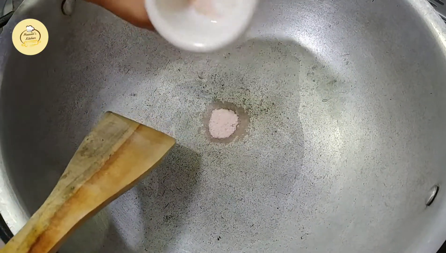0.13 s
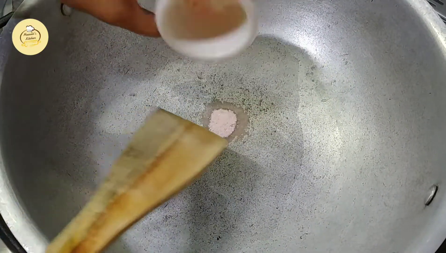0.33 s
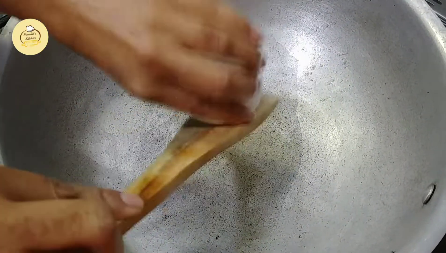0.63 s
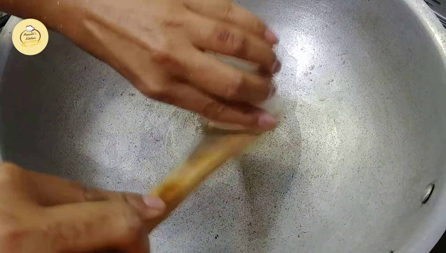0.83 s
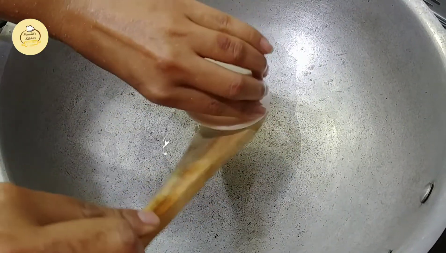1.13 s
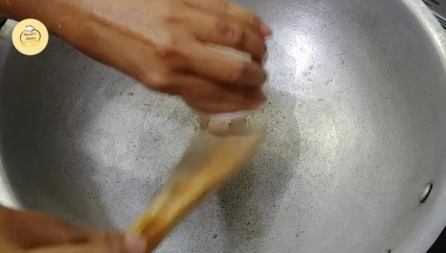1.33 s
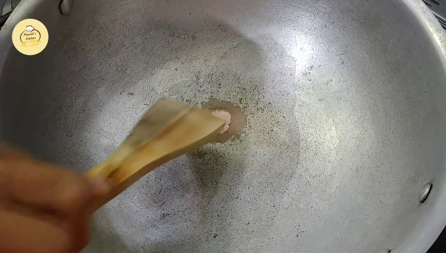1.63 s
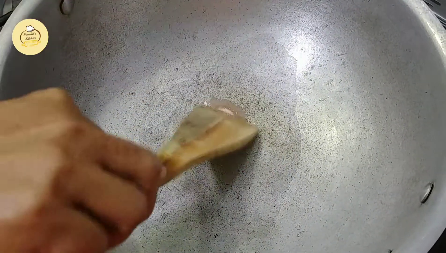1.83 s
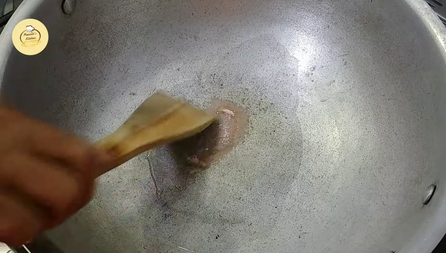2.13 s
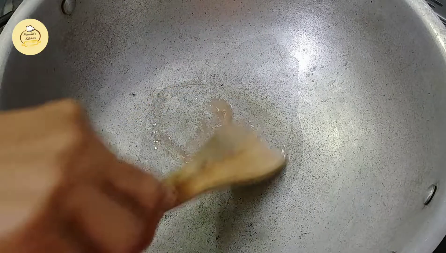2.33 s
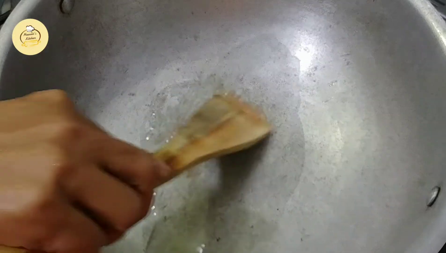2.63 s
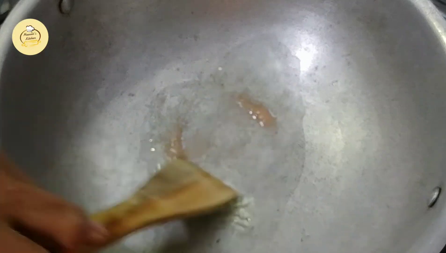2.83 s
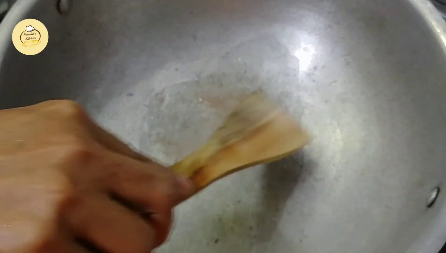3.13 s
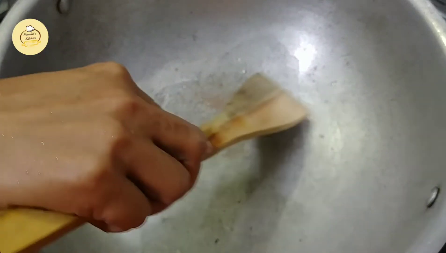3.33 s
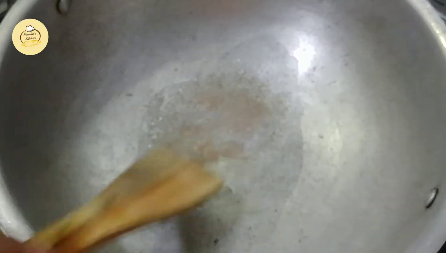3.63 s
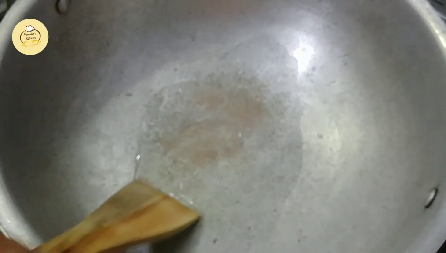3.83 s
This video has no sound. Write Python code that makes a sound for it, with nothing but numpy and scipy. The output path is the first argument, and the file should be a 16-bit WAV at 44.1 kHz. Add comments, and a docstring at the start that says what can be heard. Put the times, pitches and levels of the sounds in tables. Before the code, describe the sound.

Small cup knocks three times on a wooden spatula, then the spatula scrapes a sizzling metal pan.

```python
"""At the stove in a hard-walled kitchen, two microphones: a steady rumble, hiss and motor hum, faint sizzle.
A light bump and tick in the pan come first, then a small cup knocks three times on a wooden spatula
over the hot metal pan, which rings softly in answer. The sizzle jumps up and swells as wet seasoning is
spread, and the blade stirs in four strokes of rubbing noise, with grit catches and bumps that ring the pan.
Noise bursts and dying sines make the knocks, random grains the rubbing and sizzle; echoes place them."""
import sys
import numpy as np
from scipy import signal
from scipy.fft import rfft, irfft
from scipy.io import wavfile
from scipy.ndimage import uniform_filter1d, minimum_filter1d

SR = 44100
rng = np.random.default_rng(int(sys.argv[2]) if len(sys.argv) > 2 else 0)


def dump(signal):
    """Clip the signal to [-1, 1] and save it as 16-bit WAV at the path in sys.argv[1]."""
    limited = np.clip(np.atleast_2d(signal).T, -1, 1)
    pcm = np.round(limited * 32767).astype(np.int16)
    wavfile.write(sys.argv[1], SR, pcm)


N = 176400  # 4 s


def amp(db):
    """Decibels to gain."""
    return 10 ** (np.asarray(db) / 20)


def unit(x):
    """Scales to rms 1."""
    return x / np.sqrt(np.mean(x ** 2) + 1e-20)


def read(points, hz):
    """Reads a table of (hz, value) on a log-frequency axis."""
    point_hz, value = np.transpose(points)
    return np.interp(np.log(hz + 1), np.log(point_hz + 1), value)


def add(mix, start_s, sound):
    """Adds a sound to the mix in place, cut off where the mix ends."""
    part = mix[max(round(start_s * SR), 0):][:len(sound)]
    part += sound[:len(part)]


def colour(x, points, peaks=(), size=4096):
    """Minimum-phase filter: energy never precedes its cause; peaks add resonances to the spectrum."""
    hz = abs(np.fft.fftfreq(size, 1 / SR))
    resonance = 1 + sum(amp(db) / (1 + (2 * (hz - f) / width) ** 2) for f, width, db in peaks)
    gain = amp(read(points, hz)) * resonance
    # the Hilbert transform of the log gain gives the minimum phase
    spectrum = np.exp(np.conj(signal.hilbert(np.log(gain))))
    taps = np.fft.ifft(spectrum).real
    return signal.oaconvolve(x, taps)[:len(x)]


def band(x, hz, kind, order=2):
    """Butterworth low-pass or high-pass."""
    sections = signal.butter(order, min(hz, SR / 2 - 1), kind, fs=SR, output="sos")
    return signal.sosfilt(sections, x)


def ring(modes, pitch=1):
    """Half a second of dying sines, one for each mode of a struck body."""
    t = np.arange(SR // 2) / SR
    return sum(amp(db - 60 * t / t60) * np.sin(2 * np.pi * hz * pitch * t) for hz, db, t60 in modes)


def burst(t60):
    """Half a second of white noise that falls 60 dB in t60 seconds."""
    t = np.arange(SR // 2) / SR
    return rng.standard_normal(len(t)) * np.exp(-np.log(1000) * t / t60)


def grains(per_s, spread_db):
    """Random clicks of either sign, mostly small, a few large."""
    size = amp(spread_db * np.minimum(rng.exponential(1, N), 5))
    sign = rng.choice([-1, 1], N)
    present = rng.random(N) < per_s / SR
    return unit(size * sign * present)


def wander(hz):
    """Random fluctuation of rms 1, mostly slower than hz."""
    rolloff = 1 + (np.fft.rfftfreq(N, 1 / SR) / hz) ** 4
    return unit(irfft(rfft(rng.standard_normal(N)) / rolloff, N))


MONO_BELOW_HZ = 680


def pair(a, b):
    """Two noises become left and right, alike in the bass and increasingly independent above."""
    same = 1 / (1 + (np.fft.rfftfreq(len(a), 1 / SR) / MONO_BELOW_HZ) ** 2)
    right = irfft(same * rfft(a) + np.sqrt(1 - same ** 2) * rfft(b), len(a))
    return np.array([a, right])


# Decay of the kitchen before its spectrum is evened: pitch_hz, t60_s
ROOM_DECAY = [(100, 1), (500, 0.37), (1400, 0.29), (4000, 0.23), (10000, 0.31)]
ROOM_ONSET_S, ROOM_EVEN_HZ = 0.005, 45  # rise time; width over which the spectrum is evened


def room_tail():
    """Diffuse stereo tail: low bass lingers longest, and the spectrum is evened out."""
    t = np.arange(SR // 2) / SR
    noise = pair(*rng.standard_normal((2, len(t))))
    hz, when, z = signal.stft(noise, SR, nperseg=256)
    z *= np.exp(-np.log(1000) * when / read(ROOM_DECAY, hz)[:, None])
    onset = np.minimum(t / ROOM_ONSET_S, 1)
    decaying = signal.istft(z, SR)[1][:, :len(t)] * onset
    spectrum = rfft(decaying, SR)
    power = uniform_filter1d(abs(spectrum) ** 2, ROOM_EVEN_HZ, axis=1)
    tail = irfft(spectrum / np.sqrt(power), SR)[:, :len(t)] * onset
    return tail / np.linalg.norm(tail[0])


# Early wall reflections: delay_s, left_gain, right_gain (both before echo_db)
WALL_ECHOES = [(.0032, 0.15, 0.16), (.0092, 0.13, 1), (0.0108, 0.083, 0.71), (0.0145, .4, .2),
               (.0255, 0.1, 0.42)]
RIGHT_LAG = 6  # samples by which direct sound is later at the right microphone, about 5 cm of path
DRIFT_HZ = 2.1  # how fast the paths to the walls change as the hands move


def kitchen(x, room_db, echo_db, count=4):
    """Direct sound, a few wall reflections, and diffuse tails that take turns as the paths change."""
    early = np.zeros((2, SR // 20))
    early[0, 0] = early[1, RIGHT_LAG] = 1
    for delay_s, left, right in WALL_ECHOES:
        early[:, round(delay_s * SR)] += amp(echo_db) * np.array([left, right])
    out = signal.oaconvolve(x[None], early, axes=1)[:, :N]
    turn = 2 * np.pi * DRIFT_HZ * np.arange(N) / SR
    shares = np.array([np.maximum(np.cos(turn - 2 * np.pi * k / count), 0) for k in range(count)])
    for share in shares / np.linalg.norm(shares, axis=0):
        out += amp(room_db) * signal.fftconvolve((x * share)[None], room_tail(), axes=1)[:, :N]
    return out / np.sqrt(1 + amp(room_db) ** 2)


RING_LAG_S = 0.00035  # about 12 cm of path


def spread(x):
    """The wide pan's ring reaches the right microphone a little later."""
    delay = np.exp(-2j * np.pi * np.fft.rfftfreq(N, 1 / SR) * RING_LAG_S)
    return np.array([x, irfft(rfft(x) * delay, N)])


# Rumble and hiss at the stove as heard at the microphones: pitch_hz, level_db (relative, per Hz)
STOVE_HEARD = [(20, -39), (33, -20), (50, -15), (70, -3), (105, 1.5), (140, -6.5), (230, -6.5),
               (340, -13.5), (600, -17), (1400, -27), (6000, -35), (8100, -35.5), (9600, -46.5),
               (12000, -41), (15500, -35)]
# Motor hum: pitch_hz, level_db (rms, before the balance of the microphones)
MOTOR_HUM = [(101, -49), (200, -69), (250, -61.5)]
STOVE_DB = -47.5  # rms, before the balance of the microphones


def stove():
    """Steady filtered noise rumbles and hisses; the motor hums on sines whose phase wavers."""
    t = np.arange(N) / SR
    rumble = pair(*[unit(colour(z, STOVE_HEARD)) for z in rng.standard_normal((2, N))])
    hum = np.zeros(N)
    for hz, db in MOTOR_HUM:
        phase = 2 * np.pi * hz * t + 1.05 * wander(4.5)  # radians
        hum += amp(db) * np.sqrt(2) * np.sin(phase)
    return amp(STOVE_DB) * rumble + hum


# How loudly the seasoning sizzles before the room: time_s, level_db
SIZZLE_LOUDNESS = [(0, -57), (.7, -60.5), (1.55, -63), (1.674, -47.5), (1.686, -49), (2.15, -51),
                   (2.5, -33.5), (3.1, -38), (3.33, -41), (3.7, -43.5), (4, -40)]
# Sizzle as heard at the microphones, with a narrow peak near 8 kHz and little just above it:
# pitch_hz, level_db (relative, per Hz)
SIZZLE_HEARD = [(500, -24.5), (2000, -16), (4000, -15), (6000, -20), (7000, -8.5), (7900, 6.5), (8500, -1),
                (9500, -11.5), (10800, -66.5), (12500, -20), (15500, -26)]
POPS_PER_S, POP_SPREAD_DB, SIZZLE_ROOM_DB = 1300, 4.5, 7


def sizzle():
    """Tiny bubbles burst at random, more loudly once the wet seasoning is spread."""
    level = amp(np.interp(np.arange(N) / SR, *np.transpose(SIZZLE_LOUDNESS)))
    pops = unit(colour(grains(POPS_PER_S, POP_SPREAD_DB), SIZZLE_HEARD))
    return kitchen(level * pops, SIZZLE_ROOM_DB, echo_db=-13)


# Spatula bumping the pan (levels relative):
# start_s, level_db, lowest_hz, highest_hz, chatter_t60_s, ring_db
PAN_BUMPS = [(0.037, -27, 60, 197, 0.058, 11.5), (0.655, -29.5, 235, 1780, 0.05, 4),
             (1.797, -14.5, 130, 1780, .06, -4), (2.842, 0.5, 87, 700, 0.16, 6),
             (3.061, -4.5, 109, 3254, 0.054, 2), (3.073, -3.5, 110, 3100, 0.077, -11),
             (3.396, -27, 120, 1490, 0.063, 6), (3.782, -9.5, 650, 785, 0.033, 16),
             (3.858, -8, 100, 774, 0.061, -14)]
# Modes of the pan on its stand: pitch_hz, level_db (relative), t60_s
PAN_MODES = [(74, -4, .4), (118, -3, .45), (200, -9, .3), (252, 0, .4), (302, -7, .36), (338, -1, .45),
             (369, -4, .38), (452, -7, .32), (712, -7, .3), (750, -2, .28), (846, 2, .32), (1448, -8, .28),
             (2169, -10, .22)]
PAN_DB, THUD_DB, THUD_T60, CHATTER_DB, KNOCK_ROOM_DB = -28, 5.5, 0.027, -11, 5  # dB, T60 in s


def knocks():
    """The blade bumps the pan, chatters briefly and sets it ringing; each contact has its own band."""
    thuds, rings = np.zeros((2, N))
    for start_s, db, low_hz, high_hz, chatter_s, ring_db in PAN_BUMPS:
        thud = amp(THUD_DB) * (burst(THUD_T60) + amp(CHATTER_DB) * burst(chatter_s))
        pan_ring = amp(PAN_DB + ring_db) * ring(PAN_MODES)
        for mix, sound in (thuds, thud), (rings, pan_ring):
            below = band(sound, high_hz, "low", order=4)
            contact = band(below, low_hz, "high", order=3)
            add(mix, start_s, amp(db) * contact)
    return kitchen(thuds, KNOCK_ROOM_DB, echo_db=-1) + spread(rings)


# Strokes of the spatula, one list each: time_s, level_db (rubbing, relative), extra_treble_db
STIR_STROKES = [
    [(1.79, -35, -3.5), (1.81, -49.5, -3.5), (1.885, -38, 5), (1.94, -49, 7), (1.965, -38, 0.5),
     (1.99, -32.5, 0.5), (2.03, -39, -30), (2.08, -70, 4)],
    [(2.195, -63.5, 21.5), (2.235, -39.5, -1.5), (2.28, -32.5, -9.5), (2.33, -30, -3.5), (2.38, -36.5, 6),
     (2.42, -32, -2), (2.5, -37.5, -0.5), (2.57, -23.5, -5), (2.598, -26, 4), (2.607, -25, 10),
     (2.624, -33, 2), (2.636, -31.5, -1), (2.7, -33, -9), (2.712, -28, -32), (2.76, -28, 5.5),
     (2.8, -33, -19), (2.85, -24, -8), (2.93, -34.5, 2), (3.0, -23, -2), (3.05, -43, -36), (3.16, -38, -18)],
    [(3.39, -70, 28), (3.402, -45, 6), (3.45, -37, 3), (3.47, -34.5, 6.5), (3.52, -28, 1.5),
     (3.545, -82, -13), (3.61, -73, -3)],
    [(3.855, -31, -28), (3.87, -27, -8), (3.92, -23.5, -3), (3.945, -25.5, -20), (3.97, -33, -16),
     (4.0, -59, -9)],
]
# Sharp ticks in the pan, mostly the blade catching on grit: start_s, level_db (relative)
GRIT_CATCHES = [(0.654, -43), (1.683, -47), (1.863, -26), (1.979, -19), (2.206, -29.5), (2.278, -14.5),
                (2.325, -16), (2.413, -16.5), (2.542, -39), (2.712, -13.5), (2.738, -18), (2.808, -15),
                (3.463, -20.5), (3.483, -17.5), (3.572, -46), (3.964, -18.5)]
# Rubbing as heard at the microphones, with a peak near 8 kHz and a dip above it:
# pitch_hz, level_db (relative, per Hz)
RUBBING_HEARD = [(30, -31), (70, 2.5), (150, -2.5), (330, -5), (600, -8.5), (950, -9.5), (1250, -1),
                 (1800, -7), (2400, 0), (3700, -2.5), (5000, -0.5), (7000, -3.5), (7800, 7), (8300, 2),
                 (9500, -14), (10700, -34.5), (12500, -19.5), (15500, -28.5)]
# Resonances of the pan wall under rubbing: pitch_hz, width_hz, level_db (over the spectrum)
PAN_WALL = [(1550, 137, 4.5), (2109, 147, 7.5), (2802, 59, 10.5), (3330, 47, -1), (4487, 117, 2),
            (5300, 135, -2), (6080, 70, -1)]
RUB_DB, TREBLE_HZ, RUB_ROOM_DB = 9.5, 3870, 0.5
SLIPS_PER_S, SLIP_SPREAD_DB, JUDDER_DB, JUDDER_HZ = 9000, 3, 4.18, 114
CATCH_S, CATCH_DB, CATCH_LOWEST_HZ = 0.0029, -3.5, 2380  # a catch peaks after half of CATCH_S


def scrape():
    """Dense uneven slips of wood on metal, and catches on grit, drive the pan wall."""
    t = np.arange(N) / SR
    level, treble, grit = np.zeros((3, N))
    for stroke in STIR_STROKES:
        time_s, db, extra_db = np.transpose(stroke)
        touching = (t >= time_s[0]) * (t <= time_s[-1])
        gain = amp(np.interp(t, time_s, db)) * touching
        level += gain
        treble += gain * amp(np.interp(t, time_s, extra_db))
    for start_s, db in GRIT_CATCHES:
        age = np.maximum(t - start_s, 0) / (CATCH_S / 2)
        grit += amp(CATCH_DB + db) * age * np.exp(1 - age)
    judder = amp(JUDDER_DB * wander(JUDDER_HZ))
    slips = unit(grains(SLIPS_PER_S, SLIP_SPREAD_DB) * judder)
    drive = level * band(slips, TREBLE_HZ, "low", order=3)
    drive += treble * band(slips, TREBLE_HZ, "high", order=3)
    drive += grit * band(rng.standard_normal(N), CATCH_LOWEST_HZ, "high")
    rubbing = amp(RUB_DB) * colour(drive, RUBBING_HEARD, PAN_WALL)
    return kitchen(rubbing, RUB_ROOM_DB, echo_db=-2.5)


# Cup on spatula (levels relative): start_s, level_db, pitch_factor, brightness_hz, crack_db
CUP_TAPS = [(0.8651, 5.5, 1.044, 4000, -10), (1.0567, 4.5, 0.97, 2100, 0.5), (1.2162, 2.5, 0.99, 1610, -6)]
# Modes of cup and spatula together: pitch_hz (before pitch_factor), level_db (relative), t60_s
CUP_MODES = [(932, -10.5, 0.022), (1240, -13.5, 0.0091), (1595, -3.5, 0.016), (1753, -7.5, 0.016),
             (2400, -16, 0.0063), (3033, -24, 0.064), (4060, -22.5, .008), (6050, -23.5, 0.0093)]
# Modes of the pan answering each tap from below: pitch_hz, level_db (relative), t60_s
PAN_ANSWER = [(791, -28, .22), (868, -29, .25), (933, -28, .26), (987, -33, .28), (1260, -32, .24),
              (1552, -22, .24), (1618, -21, .2), (1668, -21, .22), (1743, -24, .23), (1814, -25, .25),
              (1880, -25, .26)]
CRACK_DB, CRACK_T60, CUP_DB, CUP_ROOM_DB = -18.5, 0.076, -1, -0.5  # dB, T60 in s
CUP_LOWEST_HZ, CUP_THUMP_DB = 766, -10.5


def cup():
    """Each tap is a crack and a short hollow ring, answered by the pan; the small cup radiates little bass."""
    clack, answer = np.zeros((2, N))
    for start_s, db, pitch, bright_hz, crack_db in CUP_TAPS:
        crack = amp(CRACK_DB + crack_db) * band(burst(CRACK_T60), 5000, "low", order=3)
        hollow = band(ring(CUP_MODES, pitch), bright_hz, "low", order=1)
        add(clack, start_s, amp(CUP_DB + db) * (hollow + crack))
        add(answer, start_s, amp(db - 2.5) * ring(PAN_ANSWER))
    thump = amp(CUP_THUMP_DB) * band(clack, 210, "high")
    radiated = band(clack, CUP_LOWEST_HZ, "high", order=3) + thump
    return kitchen(radiated, CUP_ROOM_DB, echo_db=-6) + spread(band(answer, 350, "high"))


BLADE_PAN_DB = 1  # left minus right: the blade works left of centre


def scene():
    """Everything at the stove."""
    blade = (knocks() + scrape()) * amp([[BLADE_PAN_DB / 2], [-BLADE_PAN_DB / 2]])
    return stove() + sizzle() + blade + cup()


# Balance of the two microphones: pitch_hz, level_db (left minus right)
MIC_BALANCE = [(100, 2.5), (400, 2), (1400, 1), (3000, -1), (4500, 2), (7700, 9.5), (9500, 1.5),
               (12000, 0.5)]
EDGE_HZ = 15850  # upper band limit


def record(dry):
    """The left microphone hears more treble; a fast limiter holds the peaks; then the band limit."""
    tilt_db = read(MIC_BALANCE, np.fft.rfftfreq(N, 1 / SR)) / 2
    heard = irfft(rfft(dry) * amp([tilt_db, -tilt_db]), N)
    needed = 1 / np.maximum(abs(heard).max(0), 1)
    gain = uniform_filter1d(minimum_filter1d(needed, size=89), size=89)  # 89 samples, about 2 ms
    edge = signal.firwin(511, EDGE_HZ, window=("kaiser", 9), fs=SR)
    return signal.oaconvolve(heard * gain, edge[None], "same")


dry = scene()
out = record(dry)
dump(out)
```